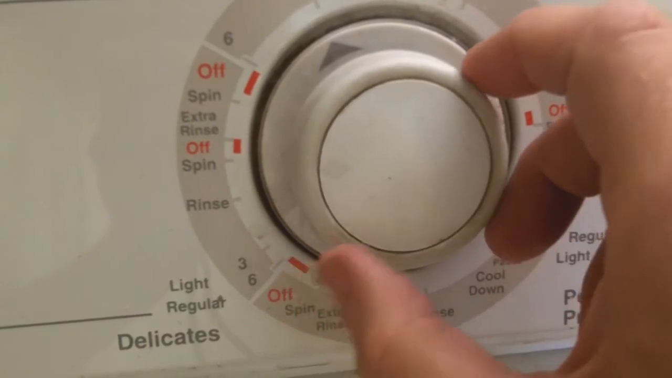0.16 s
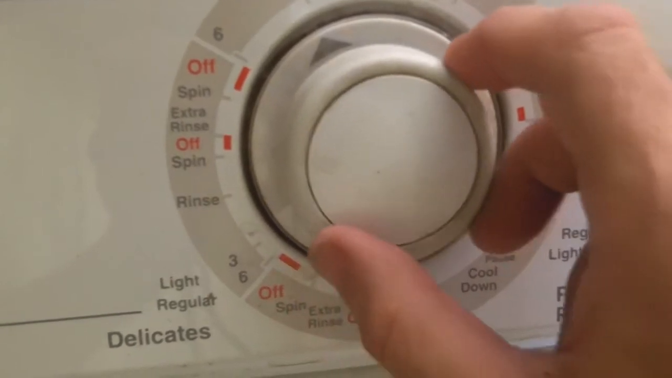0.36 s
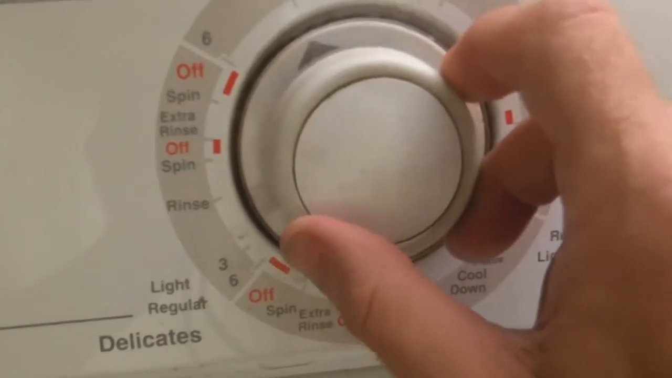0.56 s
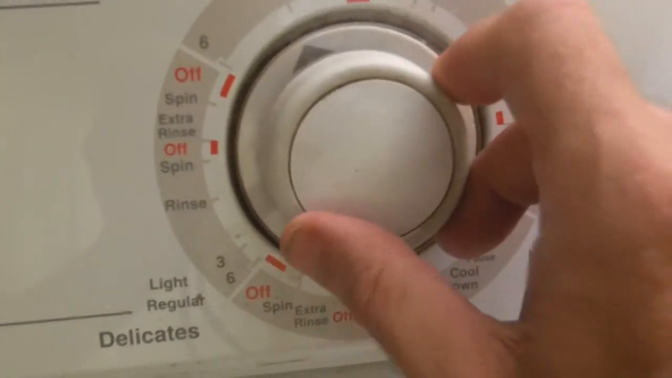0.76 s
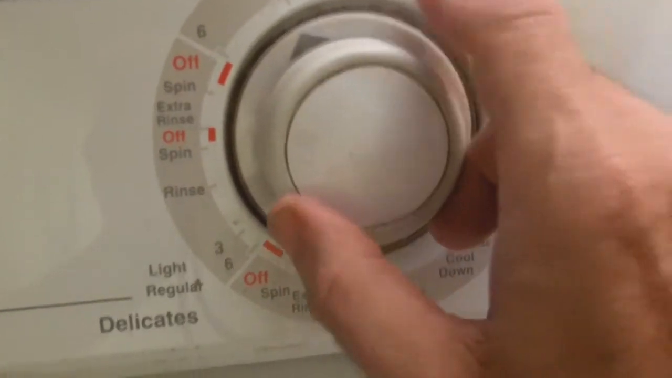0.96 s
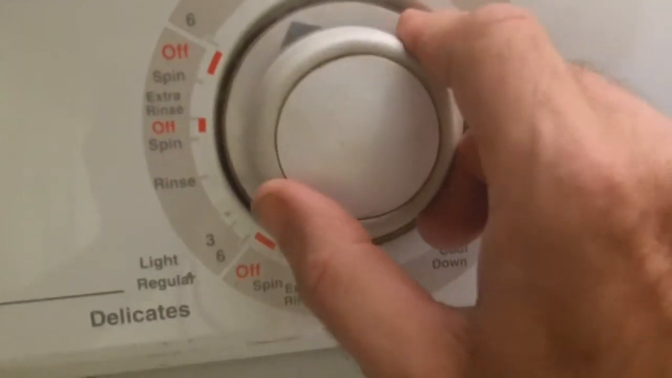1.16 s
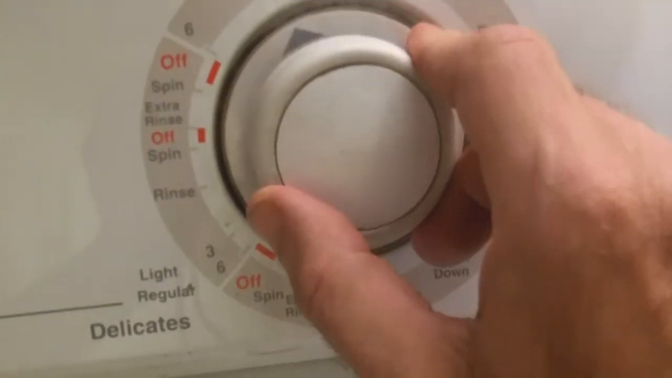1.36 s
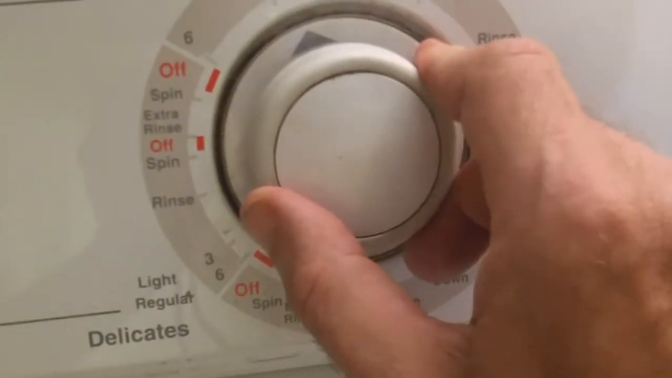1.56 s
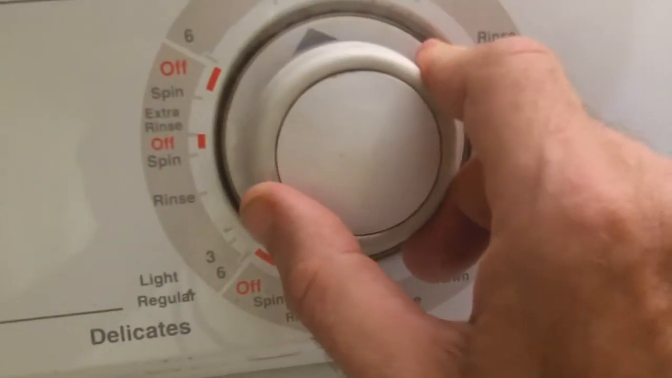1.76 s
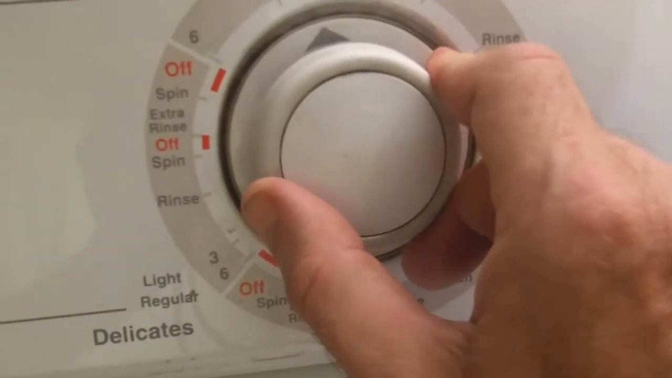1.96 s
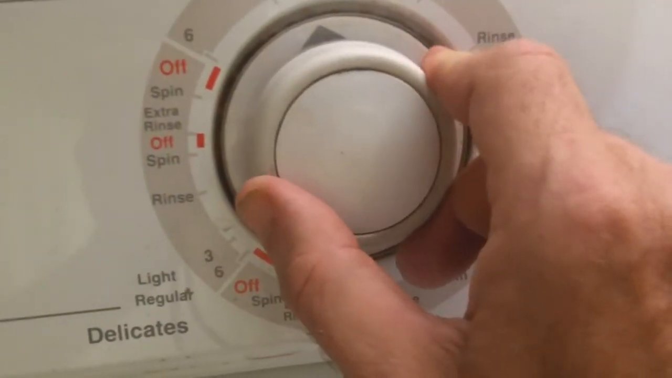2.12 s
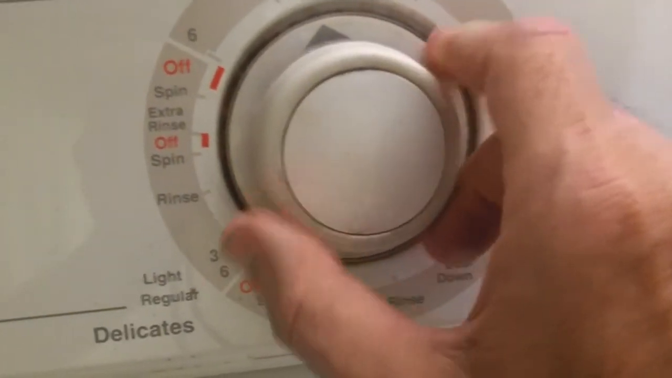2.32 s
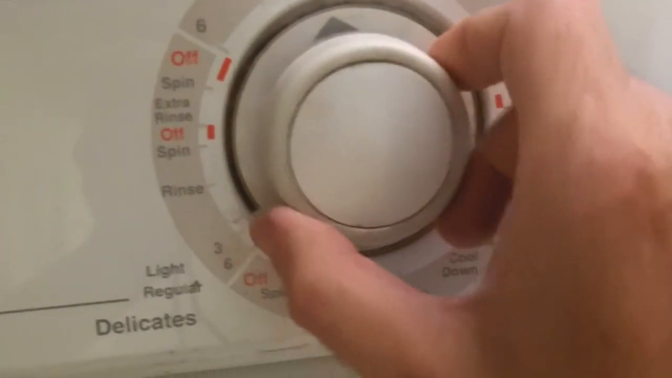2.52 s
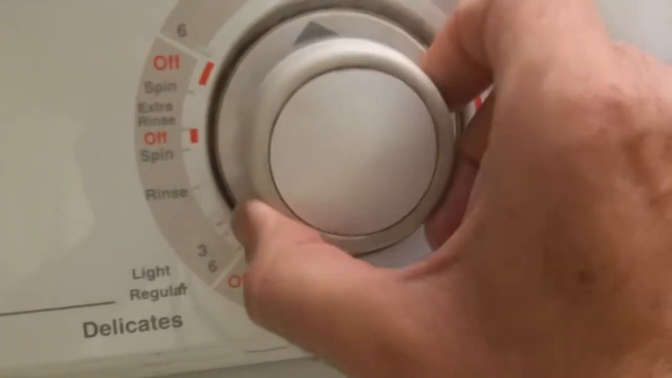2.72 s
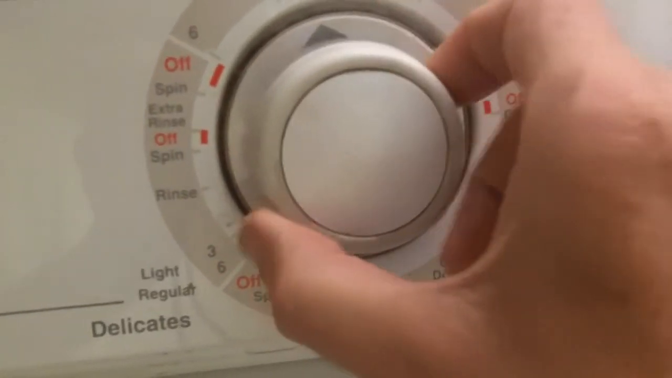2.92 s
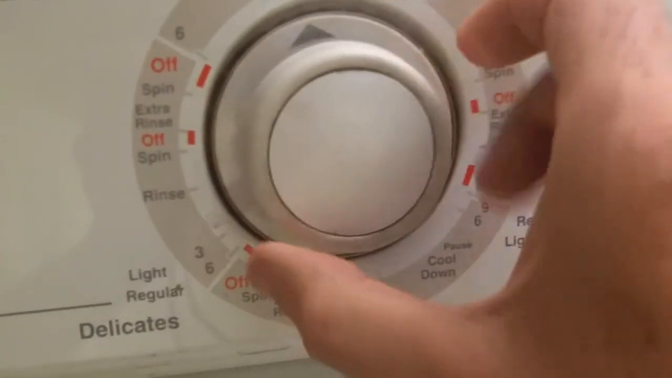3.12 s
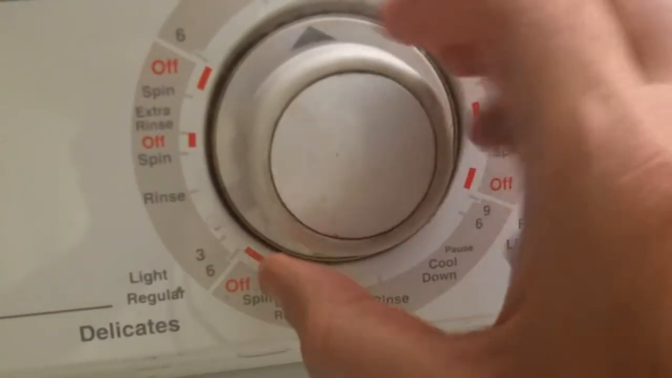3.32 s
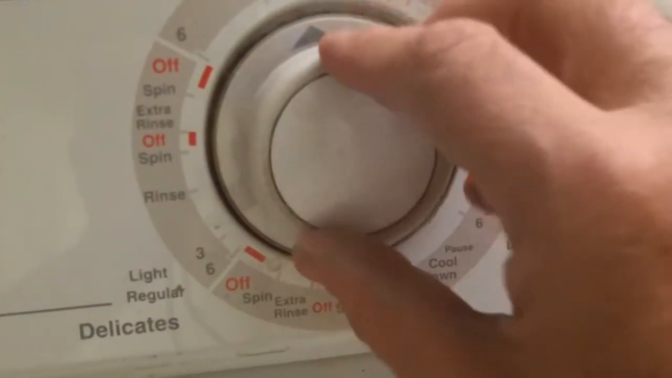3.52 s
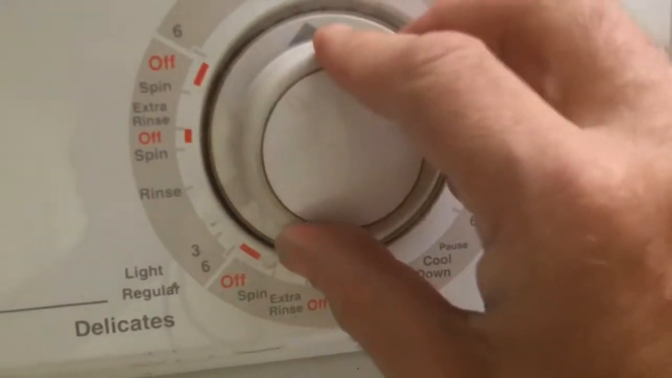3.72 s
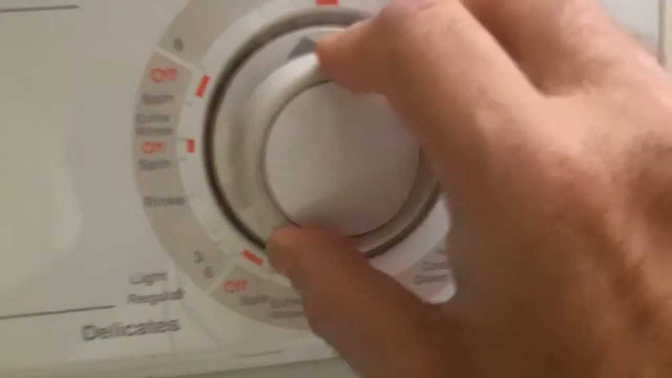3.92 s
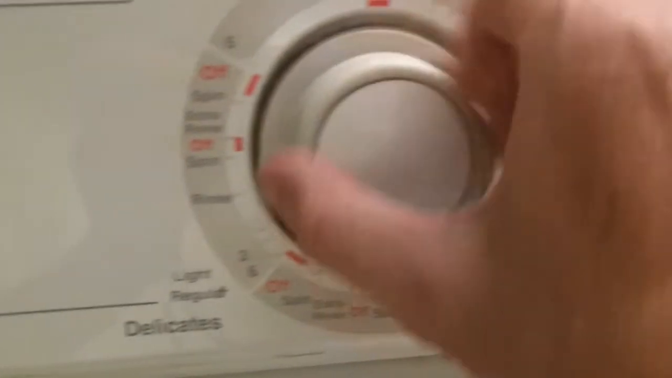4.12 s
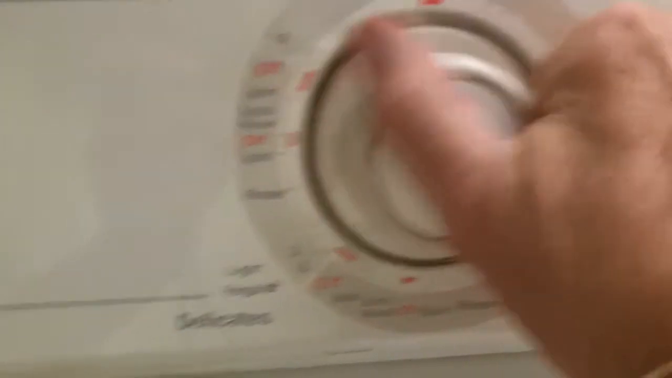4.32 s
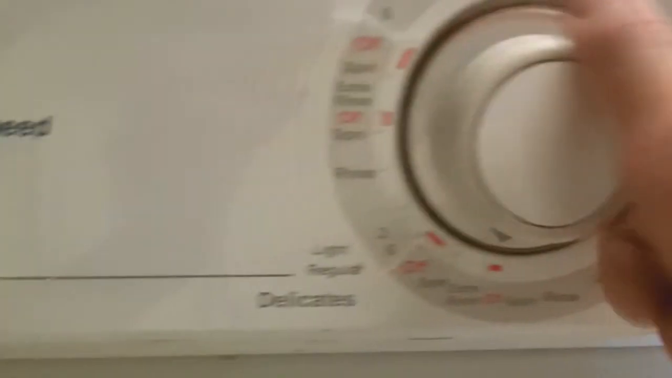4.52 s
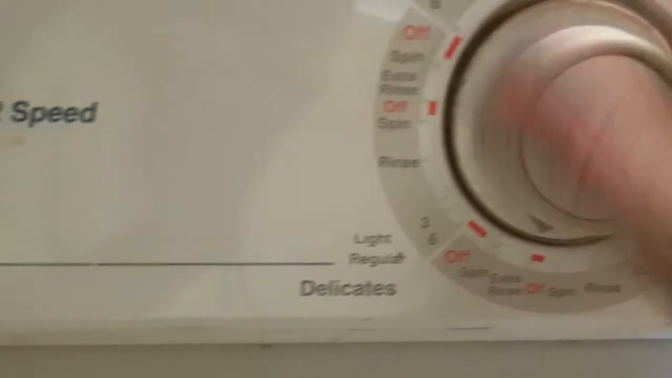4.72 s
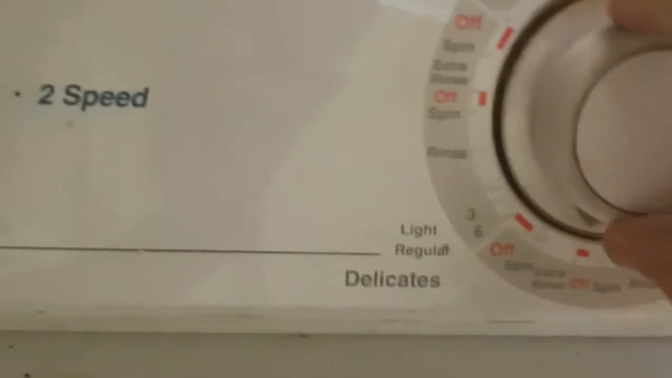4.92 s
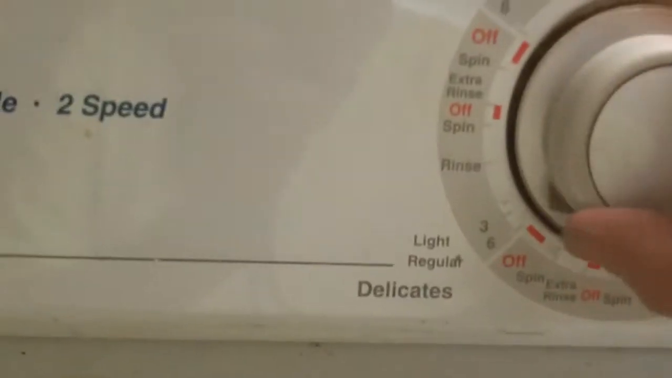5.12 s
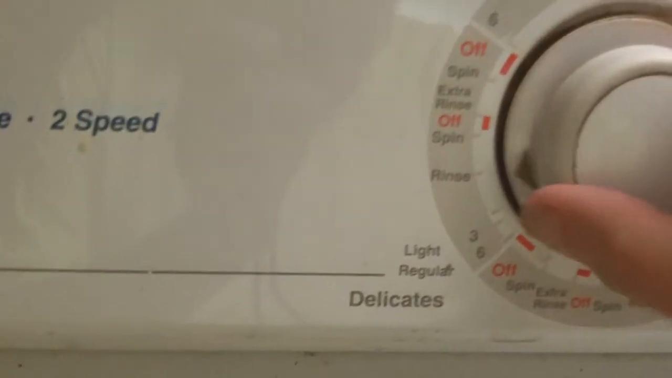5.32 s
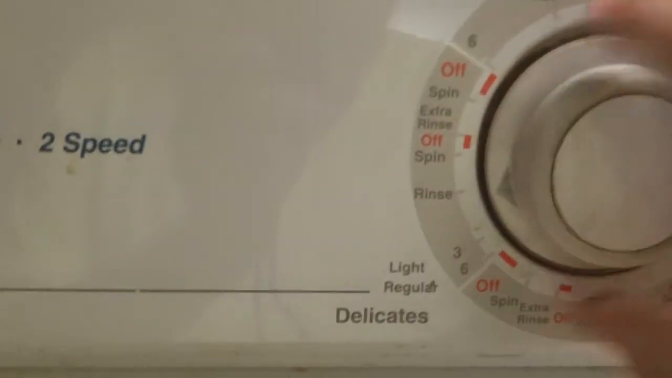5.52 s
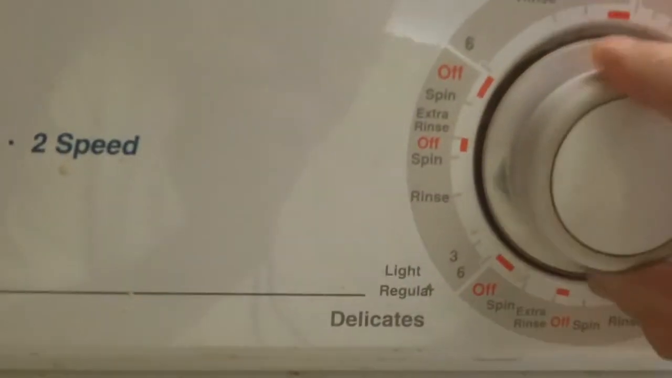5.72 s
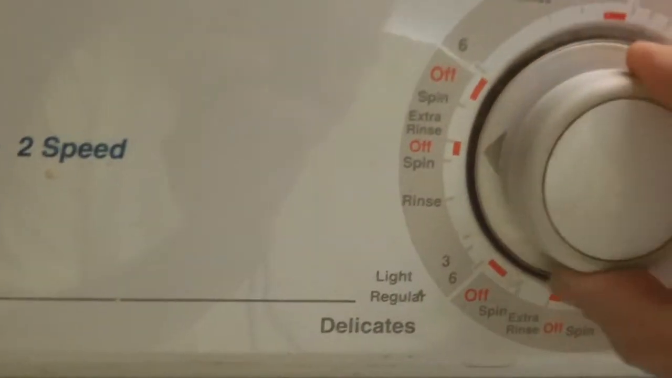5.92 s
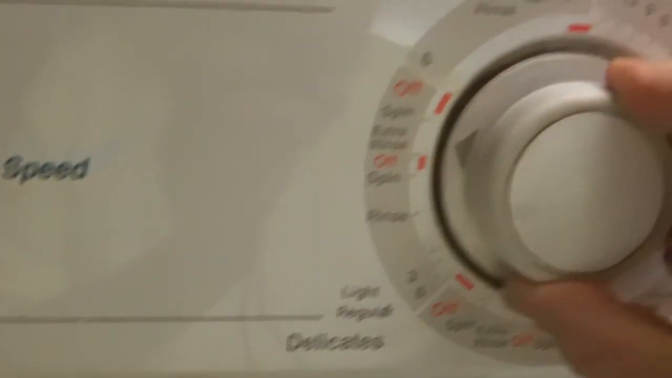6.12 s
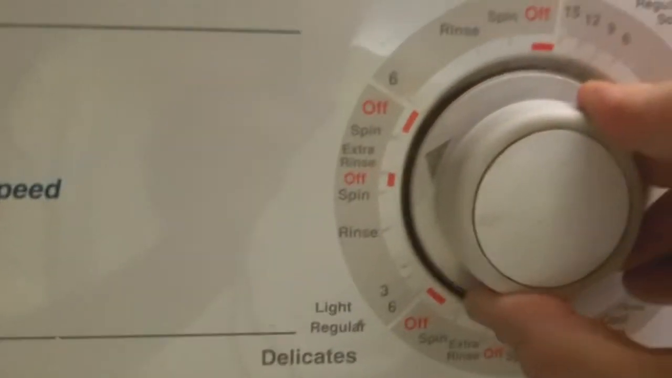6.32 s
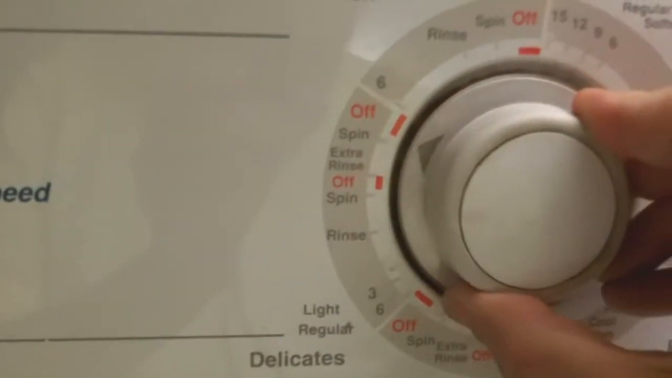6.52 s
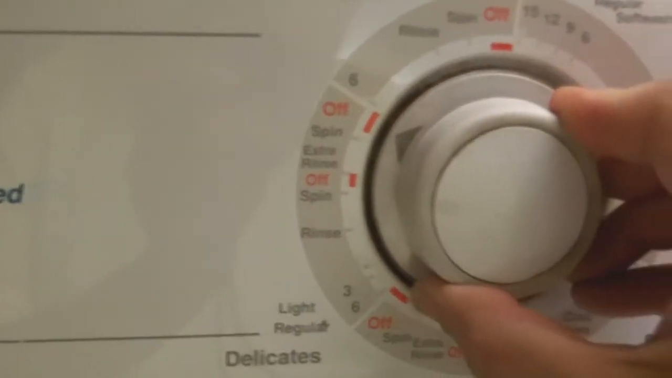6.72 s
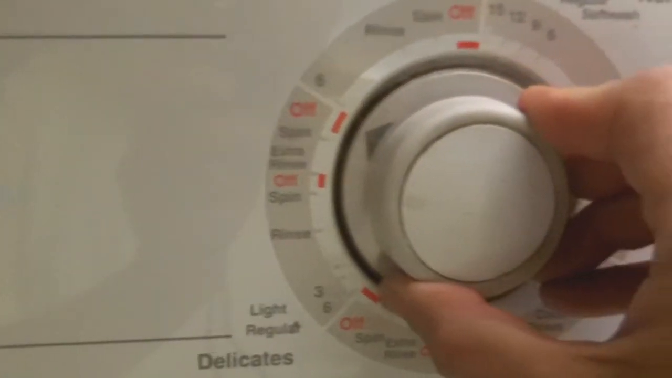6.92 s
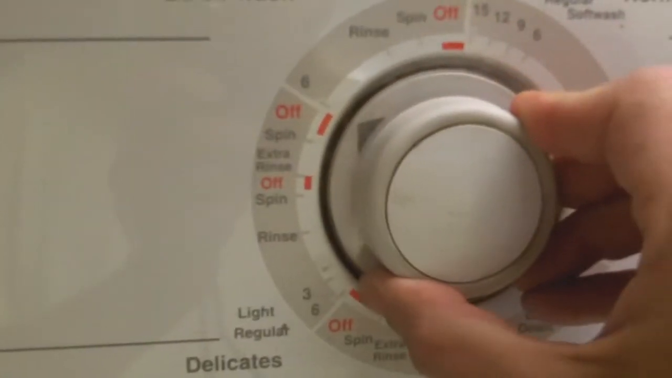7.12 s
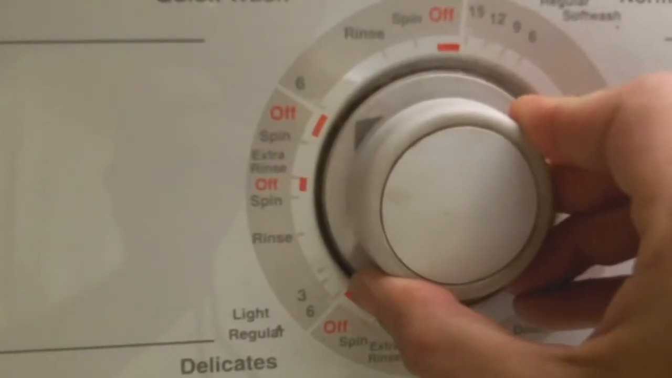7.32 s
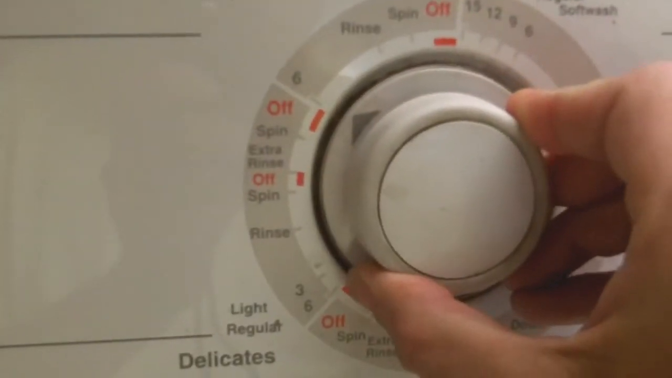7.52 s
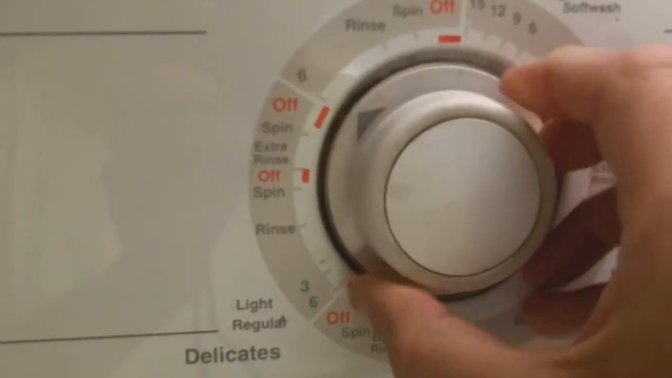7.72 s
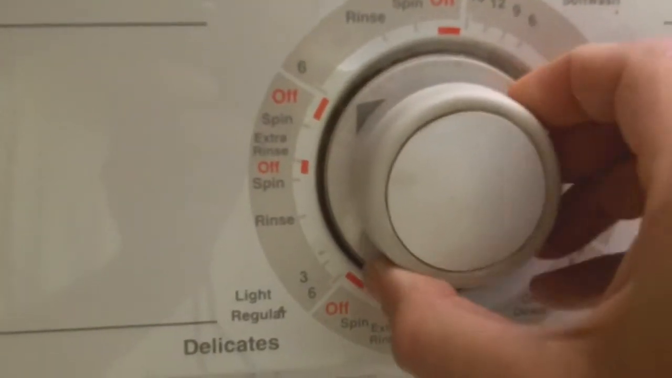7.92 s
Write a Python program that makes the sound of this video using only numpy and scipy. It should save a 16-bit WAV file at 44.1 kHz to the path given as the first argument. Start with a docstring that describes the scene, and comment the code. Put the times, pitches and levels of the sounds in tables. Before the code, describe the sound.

Faint finger scrapes and a few hard plastic knocks, then a fast ratchet whirr and uneven clicking as an appliance dial is turned.

```python
"""Faint finger scraping over room hiss comes first, then clicks, knocks and a fast ratchet whirr.
A hand pushes, pulls and turns the timer knob of a washing machine in a small quiet room, heard close.
A pawl chatters over each tooth: noise bursts excite the resonances of the plastic dial and steel panel.
Jolts add decaying knocks and booms, a leaf spring hums as a decaying tone, and steel and room ring on."""
import sys
import numpy as np
from scipy import signal
from scipy.fft import rfft, irfft, next_fast_len
from scipy.io import wavfile
from scipy.ndimage import map_coordinates

SR = 44100
rng = np.random.default_rng(int(sys.argv[2]) if len(sys.argv) > 2 else 0)


def log_audio(samples):
    """Write samples as a 16-bit WAV file to the path given in sys.argv[1]."""
    # one column per channel
    frames = np.atleast_2d(samples).T
    # limit to full scale, then quantise
    limited = np.clip(frames, -1, 1)
    pcm = np.round(limited * 32767).astype(np.int16)
    wavfile.write(sys.argv[1], SR, pcm)


N = 355490

# pawl slipping off a tooth and snapping onto the next:
# t of the snap/s, base level/dB, chatter scale/s, slip against snap/dB
TOOTH_SNAPS = [(1.4549, -22, 0.0043, -25), (1.5791, -23, 0.0041, -19), (2.092, -24, 0.0048, -37.5),
               (4.1098, -23.5, 0.008, -8.5), (4.1234, -24.5, 0.0083, -32), (4.552, -25, 0.0074, 0),
               (4.5853, -26.5, 0.013, -33), (4.6095, -15, .002, -32), (4.6543, -25, 0.0064, 1.5),
               (5.1303, -22.5, 0.01, -27), (5.1486, -21, 0.0031, -30), (5.1825, -20.5, 0.0034, -9),
               (5.2037, -23.5, 0.0042, -3), (5.2434, -20.5, 0.0034, -6), (5.2809, -23, 0.0043, -15),
               (5.3229, -24, 0.0053, -11), (5.355, -24.5, 0.0049, -30), (5.3834, -23.5, 0.0097, -17),
               (5.431, -22, 0.0037, -20), (5.8083, -26, 0.0079, -28), (5.8398, -26.5, 0.0074, -30),
               (5.8525, -20.5, 0.0069, -27), (5.9256, -23.5, 0.0046, -6.5), (5.9696, -22.5, 0.0042, -7),
               (5.9858, -20.5, 0.0049, -35), (6.0717, -25, 0.0053, -2.5), (6.1372, -24, 0.0067, -42),
               (6.2571, -25, 0.0057, -5.5), (6.4911, -25.5, 0.0055, -7.5), (6.6835, -25.5, 0.0052, -37),
               (6.7022, -23.5, 0.0062, -7.5), (7.2028, -25.5, 0.006, -27)]
SLIP_LEAD_S, SLIP_CHATTER_S = 0.007, 0.0074  # slip ahead of its snap; base scale of its chatter
SNAP_COLOUR, SLIP_COLOUR = (-12.5, -15), (-6, -18.5)  # base thud/dB, base edge/dB against the contact

# fast twist, teeth merging into a whirr: t/s, teeth passed, base level/dB, chatter scale/s
FAST_TWIST = [(4.167, 0, -23, .004), (4.222, 3, -24, 0.0061), (4.268, 6, -21, 0.0047),
              (4.308, 8, -21, 0.0041), (4.37, 13, -21, 0.0044), (4.413, 16, -26, 0.0055),
              (4.444, 17, -24, 0.013), (4.527, 21, -25, 0.0085)]
# spread between teeth of the whirr: t/s, level/dB
TWIST_SCATTER = (.001, 1.1)
# colour of a whirr tooth against its level: base thud/dB, base edge/dB
TWIST_COLOUR = (-10.5, -17.5)
TWIST_SLIP_DB = -8.5  # slip against snap

# fingers tapping the knob and taking up its slack: t/s, base level/dB, base thud against it/dB
FINGER_TOUCHES = [(0.4609, -31, -14), (.502, -46.5, 7.5), (1.091, -51, 0), (1.1385, -37, -7),
                  (1.1789, -45.5, 1), (1.3024, -42.5, -13), (1.399, -43.5, -12), (1.5616, -31.5, -7.5),
                  (1.932, -41, -7.5), (1.9723, -46, -7), (2.0412, -33.5, -5.5), (2.3149, -40, -4.5),
                  (2.4, -44, 6.5), (2.6977, -33.5, -4), (2.7422, -38, -2), (2.9207, -42.5, 6.5),
                  (3.0036, -46, -2), (3.073, -51, 3), (3.022, -39.5, -3), (3.1194, -39.5, -8),
                  (3.6592, -32, -15), (3.7123, -41.5, 3), (4.046, -48, -6.5), (4.067, -45.5, -6),
                  (4.71, -40, 0), (4.7791, -40.5, -2), (4.793, -43.5, -3), (4.9056, -38, -3.5),
                  (5.0488, -42.5, -2), (5.497, -36.5, -11), (5.5086, -39, -1), (5.523, -41.5, -1),
                  (5.5433, -46, -13), (5.6874, -35, -3.5), (5.7199, -38, -14), (5.765, -39, -12),
                  (6.0868, -41, 0), (6.619, -43, -16), (6.9172, -41, -9), (7.1843, -31, -8.5),
                  (7.465, -43, -10), (7.641, -50, -12), (7.677, -51.5, 5), (7.7695, -37, -8),
                  (7.7887, -49, 0), (7.951, -27, -2), (7.976, -38, -2)]
TOUCH_CHATTER_S, TOUCH_EDGE_DB = 0.0045, -27  # base values

# resonances of the dial and timer case: f/Hz, width/Hz, relative level/dB
DIAL_MODES = [(1080, 100, -6), (1494, 240, -3), (1996, 323, -5), (2325, 180, 0), (2950, 355, -8)]
# resonances of the console panel: f/Hz, width/Hz, relative level/dB
PANEL_MODES = [(67, 17, -9), (134, 100, -13), (259, 162, -6.5), (333.2, 40, -1), (454, 96, -8.5),
               (587.5, 72.6, 1.5), (807, 100, -3.5)]
# high resonances of the pawl, excited by the edge force: f/Hz, width/Hz, relative level/dB
PAWL_MODES = [(3087, 170, -1.5), (3400, 210, 2), (3830, 250, 1), (4600, 493, -3.5)]
# spectrum of a contact's sharp edge: f/Hz, base gain/dB
EDGE_SPECTRUM = [(3500, -2), (5500, 9.5), (7000, 4.5), (9000, 1.5), (13000, -33), (16500, -37)]
SPOT_SCATTER_DB = 3  # each contact lands on another spot of the dial

# knob shaft or hand jolting the console:
# t/s, boom/dB, knock/dB, base crack level/dB, chatter scale/s, base edge against crack/dB
CONSOLE_JOLTS = [(0.4013, -49, -27, -32.5, 0.0036, -31), (.472, -44, -36.5, -39.5, 0.013, -17.5),
                 (0.7151, -24.5, -5, -5, 0.00095, -21), (2.726, -35, -45, -36, 0.0042, -22),
                 (2.786, -26, -3, -14, 0.0043, -14), (2.7902, -62, -32, -7, 0.0018, -43.5),
                 (3.0992, -43, -9.5, -20.5, 0.0025, -24), (3.6161, -48, -35, -38, 0.0037, -30),
                 (3.647, -44.5, -54, -33, 0.0018, -20), (3.7508, -25.5, -7.5, -7, 0.0018, -21.5),
                 (4.388, -35.5, -40, -19.5, 0.0032, -19), (4.757, -52, -43, -41, 0.0023, -25),
                 (4.844, -43, -27, -40, 0.0022, -34), (4.999, -52, -30, -38, 0.0028, -32),
                 (7.992, -32.5, -28, -41, 0.0049, -28), (8.0257, -28, 5, -10, 0.0012, -13),
                 (8.0322, -44, -5, -8.5, 0.00092, -35)]
CRACK_THUD_DB = -7.5  # base value, against the crack
# loose parts after a jolt: level against its boom/dB, chatter scale/s, base thud/dB, base edge/dB
LOOSE_PARTS = (-15, .04, -11, -21.5)
# modes of the cabinet walls: f/Hz, mean level/dB, t60/s
WALL_MODES = [(38.07, -22, 1.36), (80.3, -16.5, 0.52), (137, -11, 0.25), (196.5, 4.5, 0.034),
              (236.6, 3.5, 0.065), (308.4, -4.5, 0.088)]
# modes of the knob's shell: f/Hz, mean level/dB, t60/s
SHELL_MODES = [(1902, -0.5, 0.012), (2163, -3.5, 0.015)]
MODE_SCATTER_DB = 1.7  # strength of every wall and shell mode, from jolt to jolt

# fingers sliding on the knob: t/s, length/s, level ahead of the body resonances/dB
FINGER_RUBS = [(0, 0.74, -66), (0.464, 0.13, -58), (1.129, 0.09, -64), (1.273, 0.33, -57),
               (2.274, 0.1, -60.5), (2.69, 0.095, -47.5), (3.623, 0.079, -48.5), (3.693, 0.078, -47),
               (3.96, .03, -61), (4.049, 0.068, -58), (7.086, 0.023, -52.5), (7.762, 0.073, -53.5),
               (7.89, 0.066, -55.5)]

# leaf spring left vibrating: t/s, f/Hz, base level/dB, length/s, t60/s
SPRING_TONES = [(0.782, 622, -50, 0.26, 0.88), (1.474, 624, -50, 0.26, 0.8), (3.127, 550, -63, 0.33, 2),
                (4.708, 613, -57.5, 0.54, 3.4), (5.25, 593, -36.5, 0.032, 1.5),
                (5.468, 617, -57.5, 0.39, 2.3), (6.042, 620, -38.5, 0.027, 1.6),
                (6.201, 625, -46, 0.29, 0.74), (6.745, 616, -49.5, 0.18, 0.84)]

# ring-out of steel and room: f/Hz, t60/s, gain/dB
RING_OUT = [(58.3, 0.96, -0.5), (160, 0.98, -3.5), (413, 0.46, -2), (1060, 0.17, -4.5), (2680, 0.27, -17.5),
            (7700, 0.094, -17)]

# spectrum of room and microphone hiss: f/Hz, relative density/dB per Hz
HISS_SPECTRUM = [(15, -42), (30, 1), (100, -11), (190, -7.5), (400, -10.5), (1000, -15), (2500, -18.5),
                 (6500, -24), (9000, -26.5), (14700, -24), (16500, -43)]
# far mains hum: f/Hz, width/Hz, rms level/dB
MAINS_HUM = (121.8, 8.4, -65.5)
# dip of the microphone port: f/Hz, half-width to 1/e^2 of the depth/Hz, depth/1
PORT_DIP = (7860, 1020, 0.91)
CEILING, TOP_HZ = 0.69, 15400  # limit of the soft clipping (full scale = 1); top of the band


def amp(db):
    """Level: a gain in dB is 20 times the logarithm of the amplitude ratio."""
    return 10 ** (np.asarray(db) / 20)


def unit(x):
    """Normalisation: division by the root mean square gives rms 1."""
    return x / np.sqrt(np.mean(x ** 2) + 1e-20)


def along(points, hz):
    """Logarithmic frequency scale: values are interpolated between (f, value) points."""
    f, v = np.transpose(points)
    return np.interp(np.log(hz + 1), np.log(f + 1), v)


def filtered(x, response):
    """Linear filtering: the spectrum is multiplied by a frequency response."""
    m = next_fast_len(N + SR // 2)
    return irfft(rfft(x, m) * response(np.fft.rfftfreq(m, 1 / SR)), m)[..., :N]


def body(modes, apart=False):
    """Modal superposition: damped resonances, summed or one line each, keep white-noise power in sum."""
    def response(f):
        lines = []
        for k, (centre, width, db) in enumerate(modes):
            damping = 1j * f * width
            sign = (-1) ** k  # neighbouring modes have opposite sign
            lines.append(sign * amp(db) * damping / (centre * centre - f * f + damping))
        lines = np.array(lines)
        total = lines.sum(0)
        return (lines if apart else total) / np.sqrt(np.mean(np.abs(total) ** 2))
    return response


def noise(spectrum):
    """Spectral shaping: filtered white noise, brought to rms 1."""
    return unit(filtered(rng.standard_normal(N), lambda hz: amp(along(spectrum, hz))))


def drift(step):
    """Band limitation: random values every `step` samples are joined by a smooth curve."""
    return map_coordinates(rng.standard_normal(N // step + 4), [np.arange(N) / step])


def contacts():
    """Ratchet principle: each contact is a row (t/s, level/dB, chatter/s, thud/dB, edge/dB)."""
    s, passed, db, length = np.transpose(FAST_TWIST)
    tooth = np.arange(round(passed[0]), round(passed[-1]) + 1)
    scatter = rng.standard_normal((len(tooth), 2)) * TWIST_SCATTER
    whirr = np.transpose([np.interp(tooth, passed, column) for column in (s, db, length)])
    rows = []
    for (s, db, length), (shift, more_db) in zip(whirr, scatter):
        s, db = s + shift, db + more_db
        rows.append((s, db, length, *TWIST_COLOUR))
        rows.append((s - SLIP_LEAD_S, db + TWIST_SLIP_DB, SLIP_CHATTER_S, *SLIP_COLOUR))
    for s, db, length, slip_db in TOOTH_SNAPS:
        rows.append((s, db, length, *SNAP_COLOUR))
        rows.append((s - SLIP_LEAD_S, db + slip_db, SLIP_CHATTER_S, *SLIP_COLOUR))
    for s, db, thud_db in FINGER_TOUCHES:
        rows.append((s, db, TOUCH_CHATTER_S, thud_db, TOUCH_EDGE_DB))
    rattle_db, *rattle_rest = LOOSE_PARTS
    for s, boom_db, _, crack_db, length, edge_db in CONSOLE_JOLTS:
        rows.append((s, crack_db, length, CRACK_THUD_DB, edge_db))
        rows.append((s, boom_db + rattle_db, *rattle_rest))
    return np.array(rows)


def chatter(rows, gains_db, stretch, spiky_db):
    """Impact excitation: contact forces rise, then die away in uneven micro-impacts; one line per gain."""
    force = np.zeros((gains_db.shape[1], N + SR))
    for (s, db, length, *_), gain_db in zip(rows, gains_db):
        t = np.arange(int(12 * length * SR)) / SR
        rise = (1 - np.exp(-t / (0.0004 + 0.044 * length))) ** 2
        shape = rise * np.exp(-(t / (stretch * length)) ** 0.72)
        burst = shape * rng.standard_normal(len(t)) * amp(spiky_db * rng.standard_normal(len(t)))
        burst *= np.linalg.norm(shape) / np.linalg.norm(burst)  # random draws leave the energy unchanged
        force[:, round(s * SR):][:, :len(t)] += amp(db + gain_db)[:, None] * burst
    return force[:, :N]


def knob():
    """Forced resonance: each contact rings the dial, thumps the panel and adds a bright edge."""
    rows = contacts()
    thud_db, edge_db = rows[:, 3:4], rows[:, 4:]
    spot_db = SPOT_SCATTER_DB * rng.standard_normal((len(rows), len(DIAL_MODES)))
    # mean gain power over the modes stays 1
    spot_db -= 10 * np.log10(np.mean(amp(2 * spot_db), axis=1, keepdims=True))

    dial_force = chatter(rows, spot_db + 4.0, stretch=0.93, spiky_db=2.0)
    dial = filtered(dial_force, body(DIAL_MODES, apart=True)).sum(0)
    panel_force = chatter(rows, thud_db + 6.5, stretch=0.86, spiky_db=1.26)
    panel = filtered(panel_force, body(PANEL_MODES))[0]

    def sharp(hz):
        return amp(along(EDGE_SPECTRUM, hz) + 5.0) + amp(14.0) * body(PAWL_MODES)(hz)

    edge = filtered(chatter(rows, edge_db, stretch=1.22, spiky_db=3.0), sharp)[0]
    return dial + panel + edge


def jolts():
    """Free vibration: decaying sines give a tonal shell knock and a dull wall boom."""
    out = np.zeros(N + SR)
    t = np.arange(SR * 3 // 4) / SR

    def ring(modes, rise_s):
        total = np.zeros(len(t))
        for hz, db, t60 in modes:
            level_db = db + rng.normal(0, MODE_SCATTER_DB) - 60 * t / t60
            total += amp(level_db) * np.sin(2 * np.pi * hz * t)
        return (1 - np.exp(-t / rise_s)) * total

    for s, boom_db, knock_db, *_ in CONSOLE_JOLTS:
        boom = amp(boom_db) * ring(WALL_MODES, 0.0011)
        knock = amp(knock_db) * ring(SHELL_MODES, 0.001)
        out[round(s * SR):][:len(t)] += boom + knock
    return out[:N]


def rubs():
    """Stick-slip friction: skin slips in clumps of noise, coloured by dial and panel."""
    stroke = np.zeros(N + SR)
    for s, length, db in FINGER_RUBS:
        count = int(length * SR)
        stroke[round(s * SR):][:count] += amp(db) * signal.windows.tukey(count, 0.5)
    clumps = amp(8.5 * np.tanh(drift(300)))
    slips = unit(clumps * rng.standard_normal(N))
    return filtered(stroke[:N] * slips, lambda f: body(DIAL_MODES)(f) + 0.56 * body(PANEL_MODES)(f))


def spring():
    """Damped free oscillation: a nearly pure tone sets in softly, decays and is faded out."""
    out = np.zeros(N + SR)
    for s, hz, db, length, t60 in SPRING_TONES:
        t = np.arange(int(length * SR)) / SR
        fade = np.clip(np.minimum(t, length - t) / 0.0062, 0, 1)
        decay = amp(db + 2.5 - 60 * t / t60)
        out[round(s * SR):][:len(t)] += decay * fade * np.sin(2 * np.pi * hz * t)
    return out[:N]


def cabinet(x, piece=SR // 16):
    """Reverberation: convolution with decaying noise, drawn anew for each piece, rings steel and room."""
    out = np.zeros(N + 2 * SR)
    centre, t60, db = np.transpose(RING_OUT)
    for start in range(0, N, piece):
        hz, t, bands = signal.stft(rng.standard_normal(SR // 2), SR, nperseg=512)
        bands = bands * amp(-60 * t / along(np.c_[centre, t60], hz)[:, None])
        bands /= np.linalg.norm(bands, axis=1, keepdims=True)  # even energy per band
        tail = signal.istft(bands, SR, nperseg=512)[1]
        wet = signal.fftconvolve(x[start:start + piece], tail / np.linalg.norm(tail))
        out[start + 200:][:len(wet)] += wet  # 200 samples of delay
    # fast random gain blurs the bands of the ring-out and makes it grainy
    grain = unit(1 + 0.35 * drift(50))
    return filtered(out[:N] * grain, lambda f: amp(along(np.c_[centre, db], f)))


def background():
    """Stationary noise: shaped hiss, and a slightly unsteady hum as noise in a narrow resonance."""
    hz, width, hum_db = MAINS_HUM
    hum = unit(filtered(rng.standard_normal(N), body([(hz, width, 0)])))
    return amp(-58.5) * noise(HISS_SPECTRUM) + amp(hum_db) * hum


def scene():
    """Superposition: contacts, jolts and rubs with their tail, plus spring and background."""
    near = knob() + jolts() + rubs()
    return (near + cabinet(near) + spring() + background())[None]


def record(dry):
    """Transduction: the microphone port's dip, soft clipping of the hardest blows, a band limit."""
    centre, width, depth = PORT_DIP
    x = filtered(dry, lambda f: 1 - depth * np.exp(-((f - centre) / width) ** 2 * 2))
    x = x / (1 + np.abs(x / CEILING) ** 6) ** (1 / 6)
    return filtered(x, lambda hz: hz < TOP_HZ)


dry = scene()
out = record(dry)
log_audio(out)
```